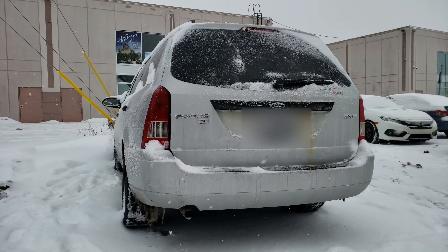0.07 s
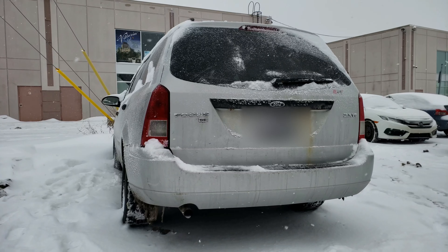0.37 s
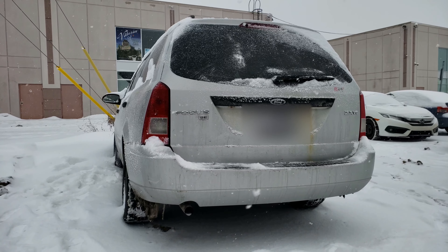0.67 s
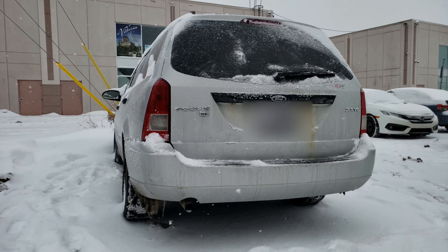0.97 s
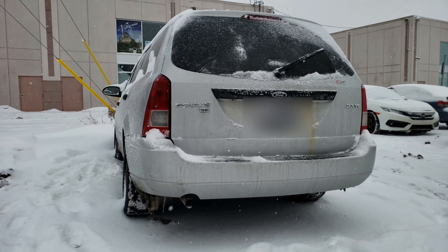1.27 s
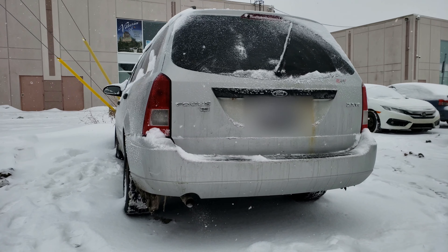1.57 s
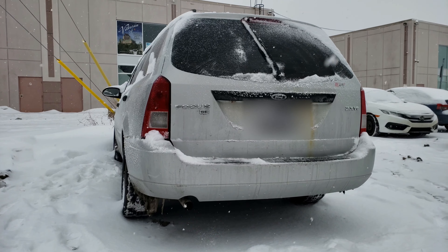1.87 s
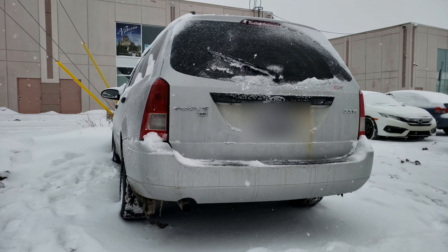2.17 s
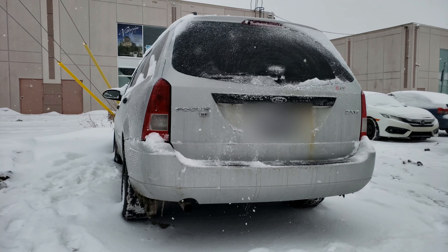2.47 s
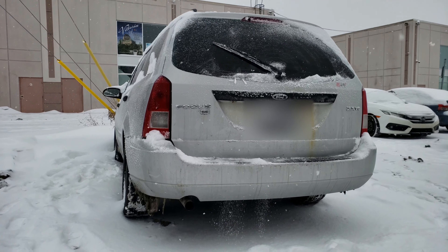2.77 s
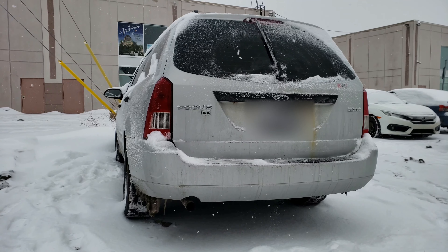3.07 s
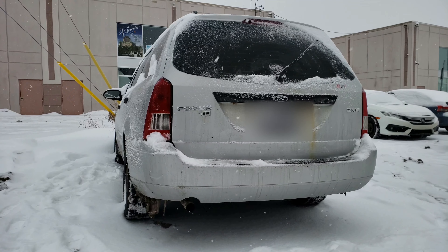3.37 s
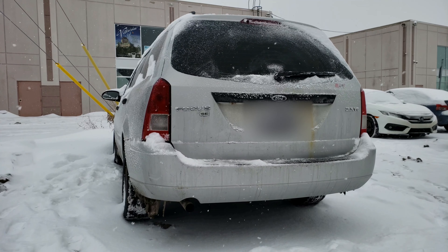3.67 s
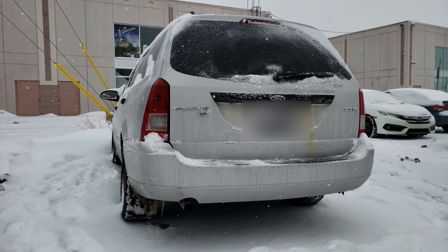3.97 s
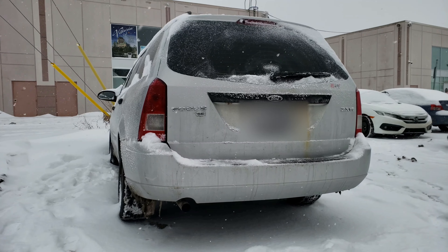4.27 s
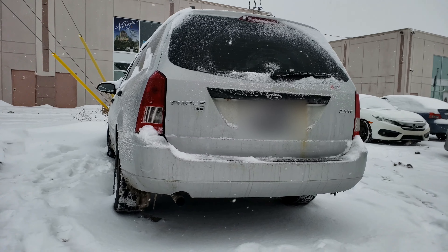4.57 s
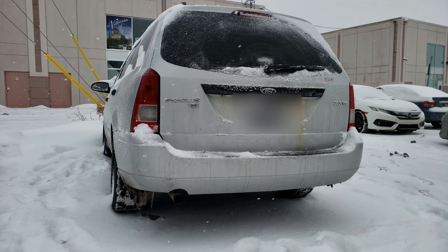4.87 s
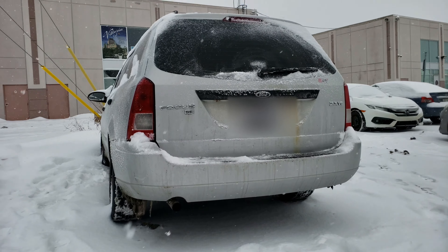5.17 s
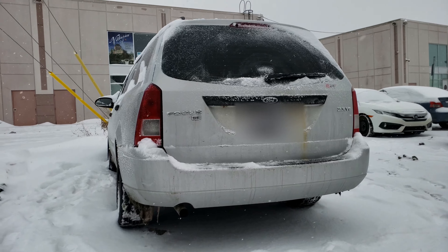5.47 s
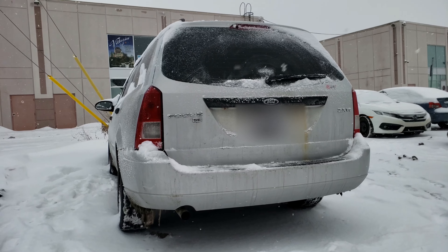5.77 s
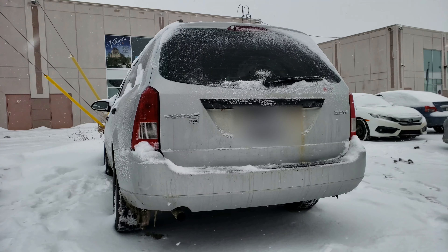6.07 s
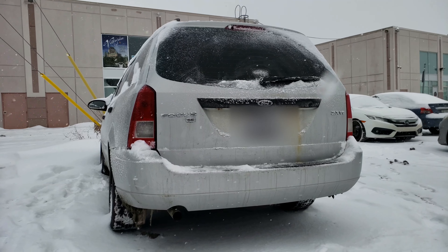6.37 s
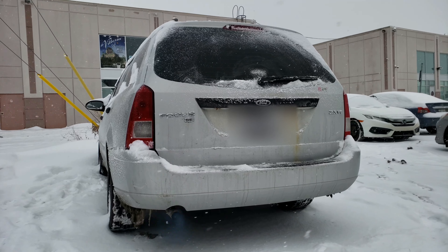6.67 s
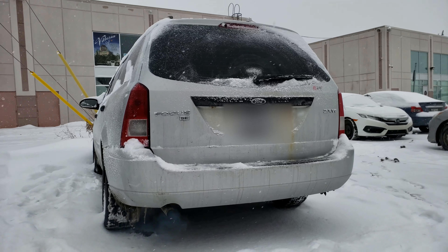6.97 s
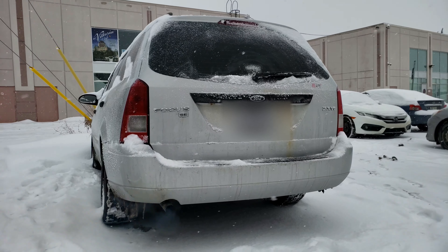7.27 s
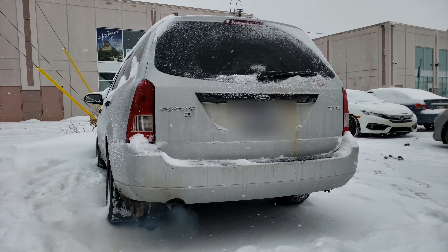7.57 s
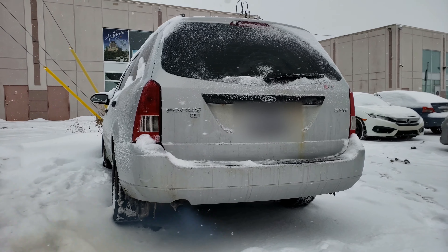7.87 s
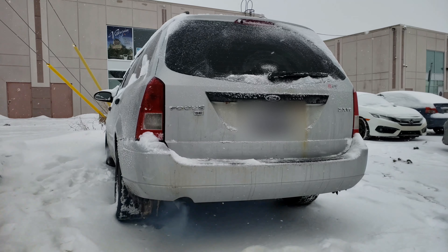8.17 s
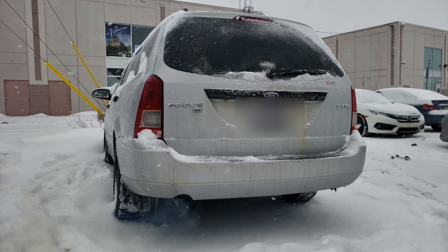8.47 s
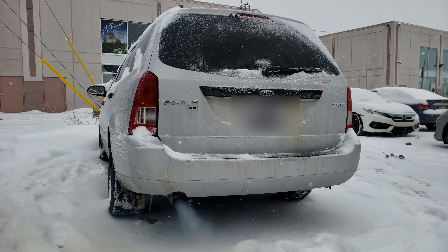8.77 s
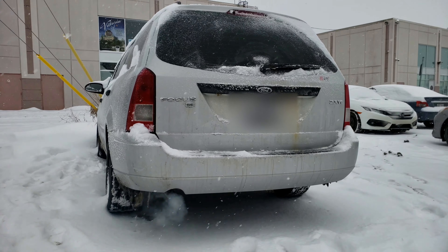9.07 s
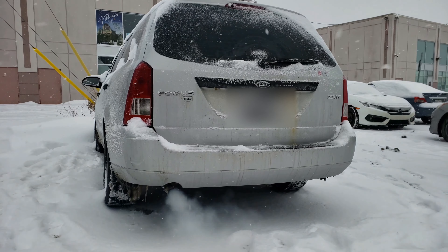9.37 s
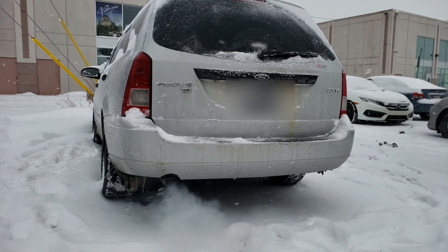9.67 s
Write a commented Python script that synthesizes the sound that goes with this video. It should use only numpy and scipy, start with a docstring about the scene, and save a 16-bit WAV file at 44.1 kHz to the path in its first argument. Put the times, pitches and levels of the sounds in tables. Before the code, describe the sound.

Heard from just behind a car parked outdoors, a cold engine cranks with a short pulsing whine and fires. It flares, sputters a little and idles for a few seconds with a low rumble and light clatter. Then comes one rev, a harder one and three quick high blips, the exhaust booming, rasping and hissing. The background is only a faint wash of distant town noise.

```python
"""Cold start in a snowy yard

A four-cylinder car is heard from behind the tailpipe while a wet power line sizzles faintly. The starter
whirrs; the engine catches, stumbles, settles to a fast idle and is revved five times. Periodic firing
makes a harmonic series that the muffler filters into a boom. With the throttle open, pressure pulses
excite the pipe's standing waves as a rasp, and the turbulent gas jet rushes."""
import sys
import numpy as np
from scipy import signal
from scipy.fft import rfft, irfft
from scipy.io import wavfile

SR = 44100
rng = np.random.default_rng(int(sys.argv[2]) if len(sys.argv) > 2 else 0)


def store_wav(level_fs):
    """Save 16-bit WAV to argv[1]."""
    pcm = np.round(np.clip(np.atleast_2d(level_fs), -1, 1) * 32767)
    wavfile.write(sys.argv[1], SR, pcm.T.astype(np.int16))


N = 437472
T = np.arange(N) / SR
HZ = np.fft.rfftfreq(N, 1 / SR)
CATCH_S, CATCH_ATTACK_S = 1.89, 0.039  # the engine begins to fire


def amp(db):
    return 10 ** (np.asarray(db) / 20)


def unit_rms(x):
    return x / np.sqrt(np.mean(x ** 2) + 1e-20)


def value_at(points, hz):
    """Interpolation on a logarithmic frequency axis."""
    freq_hz, value = np.transpose(points)
    return np.interp(np.log(hz + 1), np.log(freq_hz + 1), value)


def colour(x, spectrum):
    """Spectral shaping, normalised to rms 1."""
    return unit_rms(irfft(rfft(x) * amp(value_at(spectrum, HZ)), N))


def drift(hz):
    """Slow random modulation up to about hz, at rms 1."""
    times = np.arange(0, T[-1] + 1, .5 / hz)
    return unit_rms(np.interp(T, times, rng.standard_normal(N // 16)[:len(times)]))


def resonate(x, hz, width_hz):
    """A resonator of unit gain whose centre frequency may move."""
    carrier = np.exp(2j * np.pi * np.cumsum(hz * np.ones(N)) / SR)
    pole = np.exp(-np.pi * width_hz / SR)
    return 2 * (carrier * signal.lfilter([1 - pole], [1, -pole], x / carrier + 1e-18)).real


def ring(x, modes):
    """Modal superposition: each mode's response adds to the excitation."""
    response = 1 + sum(amp(db) / (1 + 2j * (HZ - hz) / width) for hz, width, db in modes)
    return irfft(rfft(x) * response, N)


def gate(start, end, attack, release):
    """An envelope that rises smoothly from start and decays exponentially from end."""
    rise = np.clip((T - start) / attack, 0, 1)
    return np.sin(np.pi / 2 * rise) ** 2 * np.exp(-np.maximum(T - end, 0) / release)


def arch(start, length):
    """An envelope that swells and sinks once."""
    return np.sqrt(np.abs(np.sin(np.pi * np.clip((T - start) / length, 0, 1))))


def lag(x, seconds):
    """Inertia as a first-order low-pass."""
    pole = np.exp(-1 / (seconds * SR))
    return signal.lfilter([1 - pole], [1, -pole], x)


def by_speed(rate, db, octave_db, bend_db=0, mid_hz=110):
    """A power law: db at mid_hz, plus octave_db per doubling of firing rate, curved by bend_db."""
    octaves = np.log2(rate / mid_hz)
    return amp(db + octave_db * octaves + bend_db * octaves ** 2)


def puffs(cycles, decay, steady, spread_db):
    """Amplitude modulation: two noises flare once a cycle, each time with a random strength."""
    strength = amp(spread_db * rng.standard_normal(4096))[cycles.astype(int)]
    envelope = steady + strength * np.exp(-(cycles % 1) / decay)
    return unit_rms(envelope * rng.standard_normal((2, N)))


# Likeness of left and right: freq_hz, coherence
COHERENCE = [(60, 0.44), (400, 0.68), (700, 1), (1250, 0.49), (2300, 0.91), (4200, 0.62), (7700, 0.14),
             (14000, 0.18)]
# Phase by which left leads right: freq_hz, phase_rad
PHASE_LEAD = [(0, -4), (1380, 0.93), (1640, 1.24), (2240, 1), (2840, 1.22), (3700, 1.5), (4390, 1.5),
              (5250, 4), (7580, 0.5), (9730, 13), (11200, 4), (14300, 4.5)]
# Level of left over right: freq_hz, level_db
BALANCE = [(200, -1), (500, 2.5), (1000, 1), (2000, 1), (4000, -4), (8000, -1), (14000, -1.5)]
def spatialise(pair):
    """Partial coherence: two signals mix into left and right, which differ in phase and level."""
    first, second = rfft(pair)
    coherence = np.clip(value_at(COHERENCE, HZ), 0, 1)
    mid, side = first * np.sqrt((1 + coherence) / 2), second * np.sqrt((1 - coherence) / 2)
    lead = np.exp(1j * value_at(PHASE_LEAD, HZ) / 2) * amp(value_at(BALANCE, HZ) / 2)
    return irfft(np.array([(mid + side) * lead, (mid - side) / lead]), N)


# Spectrum of distant town and still air: freq_hz, level_db
YARD_SPECTRUM = [(20, 0), (60, 3), (130, 1), (260, -11), (650, -15), (1100, -24.5), (1800, -30.5),
                 (2400, -37), (5000, -47.5), (8000, -54), (14500, -34)]
def yard(level_db=-49.5, width=0.48):
    """Diffuse noise: the surrounding streets merge into a low, restless wash."""
    mid, side = colour(rng.standard_normal((2, N)), YARD_SPECTRUM) * amp(level_db + 0.37 * drift(21))
    return np.array([mid + width * side, mid - width * side]) / np.hypot(1, width)


# Spectrum of the discharge: freq_hz, level_db
CORONA_SPECTRUM = [(1500, -38), (5200, -6), (6500, 4), (7600, -8.5), (9000, -1.5), (10000, 5.5), (11500, 2),
                   (13000, 8), (14500, -2)]
def power_line(level_db=-66, mains_hz=60):
    """Corona discharge: the snowy wire spits at both voltage crests of each mains cycle."""
    sparks = puffs(2 * mains_hz * T, decay=0.89, steady=0.16, spread_db=-1.0)
    return amp(level_db) * colour(sparks, CORONA_SPECTRUM)


# Thin tones over the idle: start_s, length_s, pitch_hz, level_db
IDLE_TONES = [(2.95, 0.99, 2110, -74), (4.6, 1.4, 1572, -74.5), (5.1, 0.66, 1265, -68.5)]
def idle_tones(width_hz=35):
    """Narrow-band noise is heard as a fuzzy pitch."""
    out = np.zeros(N)
    for start, length, hz, db in IDLE_TONES:
        band = irfft(rfft(rng.standard_normal(N)) / (1 + 2j * (HZ - hz) / width_hz) ** 2, N)
        out += amp(db) * arch(start, length) * unit_rms(band)
    return out


# Ticks and knocks: start_s, level_db, pitch_hz, decay_s, relative_crack_db
IMPACTS = [(0.955, -57, 149, 0.027, -42), (1.135, -54, 900, 0.025, 5), (1.865, -36, 152.5, 0.016, -31),
           (4.36, -66, 5010, 0.08, 10), (5.037, -60, 5010, 0.0012, 11), (5.131, -34, 517, 0.0016, -14),
           (5.1423, -34, 613, 0.0024, -17), (5.2, -62, 5000, 0.0022, 10)]
def knocks(loss_factor=0.36):
    """Damped resonance: a noise burst drives a thud and is also heard as a broadband crack."""
    out, t = np.zeros((2, N)), T[:8192]
    for start, db, hz, decay, crack_db in IMPACTS:
        burst = rng.standard_normal((2, len(t))) * np.exp(-t / decay)
        thud = signal.lfilter(*signal.iirpeak(hz, 1 / loss_factor, fs=SR), burst)
        knock = unit_rms(thud) * burst.std() + amp(crack_db) * burst
        out[:, round(start * SR):][:, :len(t)] += amp(db) * knock
    return out


def alternator(firings, level_db=-58.0, order=12):
    """A rotational order: a whine locked to engine speed while the battery recharges at idle."""
    whine = np.sqrt(2) * np.cos(2 * np.pi * order * firings)
    charging = gate(CATCH_S, end=5.9, attack=1.4, release=0.79)
    return amp(level_db) * charging * whine * (1 + .35 * drift(14))


# Compressions that load the starter: time_s, whine_db
COMPRESSION_STROKES = [(1.235, -52), (1.391, -51), (1.561, -60), (1.71, -56.5), (1.835, -58)]
# Flywheel resonances: freq_hz, width_hz, gain_db
FLYWHEEL_MODES = [(2520, 400, 2), (3650, 56, 3), (4230, 130, 2.5), (4620, 100, -20)]
# Spectrum of the gear rattle: freq_hz, level_db
GEAR_SPECTRUM = [(150, 10), (350, 6.5), (600, 1), (1000, 1.5), (1600, -9.5), (2400, -15.5), (3100, -10.5),
                 (3700, -8.5), (4350, -7), (4900, -7), (6500, -10), (8000, -15.5), (14000, -13)]
def starter(on_s=1.11, off_s=2.21, spin_up_s=.11, whine_hz=1147, width_hz=67, sag=.12):
    """Gear meshing under cyclic load: the whine sags at each compression and teeth ring the flywheel."""
    times, whine_db = np.transpose(COMPRESSION_STROKES)
    beats = np.r_[2 * times[0] - times[1], times, 2 * times[-1] - times[-2]]
    phase = 2 * np.pi * np.interp(T, beats, np.arange(len(beats)))
    slack = np.sin(phase / 2) ** 2  # 1 between compressions
    spin_up = 1 - 0.43 * np.exp(-np.maximum(T - on_s, 0) / spin_up_s)
    hz = whine_hz * (1 - sag * np.sin(phase)) * spin_up
    whine = unit_rms(resonate(resonate(rng.standard_normal((2, N)), hz, width_hz), hz, width_hz))
    contacts = puffs(np.cumsum(hz / 9) / SR, decay=1.0, steady=0.91, spread_db=3.0)
    teeth = colour(ring(contacts, FLYWHEEL_MODES), GEAR_SPECTRUM)
    cranking = amp(np.interp(T, times, whine_db) - 22 * slack) * whine + amp(-49 - 5 * slack) * teeth
    # Once it fires, the engine carries the pinion along until the rattle dies away.
    overrun = amp(-47) * gate(CATCH_S, off_s, CATCH_ATTACK_S, release=.24) * teeth
    return gate(on_s, CATCH_S, attack=0.017, release=0.025) * cranking + overrun


# Exhaust pipe resonances: freq_hz, width_hz, gain_db
PIPE_MODES = [(444, 22, 0.5), (587, 10, -0.5), (850, 82, -5), (1076, 60, 3), (1293, 56, 6.5), (1500, 56, 0),
              (1641, 45, -8), (1860, 23, -14), (2046, 46, 18.5), (2200, 36, -3), (2760, 40, 9),
              (2912, 57, 8)]
def pipe(excitation):
    """Standing waves in the exhaust pipe colour the sound that passes through it."""
    return ring(excitation, PIPE_MODES)


# Spectrum of the valve clatter: freq_hz, level_db
CLATTER_SPECTRUM = [(150, 15), (300, 4), (480, 1), (540, 1), (630, 9), (740, -5.5), (1000, -6),
                    (1500, -18.5), (1900, -21), (2300, -15.5), (3100, -18), (5000, -14.5), (8000, -22),
                    (14000, -30.5)]
# Spectrum of the gas flow: freq_hz, level_db
WHIRR_SPECTRUM = [(200, -47), (450, -1), (900, 10), (1300, 7.5), (1800, 5), (2250, 7.5), (2900, -0.5),
                  (3500, -7.5), (5500, -6.5), (8000, -18), (10500, -66), (14500, -30)]
def engine_block(rate, firings, flare, pipe_share=0.13, flare_db=-2.0):
    """Noise pulsed at the firing rate: valves clatter, and the whirr of gas flow grows with speed."""
    clatter = colour(puffs(firings, decay=0.95, steady=1.0, spread_db=0.5), CLATTER_SPECTRUM)
    clatter *= by_speed(rate, db=-41.0, octave_db=8, bend_db=2.5) * amp(flare_db * flare)
    flow = puffs(firings, decay=0.71, steady=1.0, spread_db=5.0)
    whirr = colour((1 - pipe_share) * flow + pipe_share * pipe(flow), WHIRR_SPECTRUM)
    return clatter + by_speed(rate, db=-53.5, octave_db=14.5, bend_db=1.8) * whirr


# Spectrum of the pipe's rasp: freq_hz, level_db
RASP_SPECTRUM = [(150, 14), (330, 4), (800, 9), (1300, 5), (1750, 2), (2100, -16), (2900, -25),
                 (3600, -18.5), (6000, -57.5), (14000, -43)]
def blowdown(rate, firings, load, gas_share=.65, howl_hz=1485, width_hz=110):
    """Impulse excitation: under load each cylinder's release rings the pipe, and the intake howls."""
    count = firings.astype(int)
    cylinder_db = np.array([2.5, -2.5, .8, -3.5])[count % 4]
    strength = amp(cylinder_db + 2 * rng.standard_normal(4096)[count])
    cracks = unit_rms(-np.diff(count, prepend=0) * strength / np.sqrt(rate))
    gas = puffs(firings, decay=.28, steady=.35, spread_db=2.5)
    drive = np.sqrt(1 - gas_share) * np.array([cracks, np.roll(cracks, 70)]) + np.sqrt(gas_share) * gas
    rasp = colour(pipe(drive), RASP_SPECTRUM)
    howl = unit_rms(resonate(resonate(drive, howl_hz, width_hz), howl_hz, width_hz))
    howl *= amp(np.interp(rate, [58.12, 83.85, 120, 200], [-17, -7.5, -6, -15]))
    return load * by_speed(rate, db=-35, octave_db=7) * (rasp + howl)


# Spectrum of the gas rush: freq_hz, level_db
JET_SPECTRUM = [(700, -8), (1800, 13.5), (2700, 14), (3600, 6.5), (4600, 3.5), (6500, 5.5), (8500, 2),
                (10500, -3.5), (12200, 5), (14500, -1.5)]
def gas_jet(rate, firings, load):
    """Turbulent jet noise trails a wide throttle, and persists at high speed even when coasting."""
    driven = lag(load ** 1.7, seconds=0.015) * by_speed(rate, db=-44.5, octave_db=14, bend_db=-2.5)
    coasting = by_speed(rate, db=-70.5, octave_db=28.5)
    rush = colour(puffs(firings, decay=1.0, steady=1.0, spread_db=2.0), JET_SPECTRUM)
    return (driven + coasting) * rush


# The pipe's response to the firing harmonics: freq_hz, gain_db
PIPE_RESPONSE = [(240, -13.5), (320, -6), (400, -9.5), (462, 9), (525, -8.5), (628, 8), (720, -11),
                 (820, -1), (930, -15), (1090, -8.5), (1350, -20), (1480, -18.5), (1700, -17.5), (2400, -6),
                 (3200, -39)]
def snarl(rate, firings, load, half_order_db=-5, load_db=9):
    """Formants: harmonics and weaker half orders swell as they sweep through the pipe's resonances."""
    partials = np.zeros(N)
    for order in np.arange(3, 33) / 2:
        gain = amp(value_at(PIPE_RESPONSE, rate * order) + half_order_db * (order % 1 > 0))
        flutter = 1 + .35 * drift(13)
        partials += gain * flutter * np.cos(2 * np.pi * (order * firings + rng.random()))
    return by_speed(rate, db=-48.0, octave_db=12, bend_db=-4.5) * amp(load_db * load) * partials / 2


def lope(rate, sputter, sputter_db=-4):
    """Cycle-to-cycle variation: strong and weak firings alternate unevenly, making a deep flutter."""
    hz = 41 + 8 * drift(16)
    flutter = np.cos(2 * np.pi * np.cumsum(hz) / SR) * (1 + 0.27 * drift(30))
    return np.sqrt(2) * (amp(sputter_db) * sputter + by_speed(rate, db=-64, octave_db=-4)) * flutter


def acceleration(rate, hard_octaves_per_s=0.71):
    """Tends to 1 while the engine gains speed and to -1 while it coasts down."""
    return lag(np.tanh(np.gradient(np.log2(rate)) * SR / hard_octaves_per_s), seconds=.08)


# Transmission of the muffler: freq_hz, gain_db
MUFFLER_RESPONSE = [(20, -28.5), (55, -11), (90, -2.5), (110, -0.5), (140, 1), (168, 5), (188, -2.5),
                    (210, 5.5), (252, 0.5), (268, -11.5), (304, -10.5), (350, -45), (465, -34), (720, -58)]
# Strength of the fundamental: firing_rate_hz, level_db
BOOM_LEVELS = [(46, -52), (51.5, -45.5), (53.3, -36.5), (75, -35.5), (101, -30.5), (115, -34), (133, -19),
               (150, -13.5), (172, -11), (192, -13.5), (212, -16), (226, -11.5)]
def muffler(rate, firings, load, flare, sputter, half_order_db=-16, quarter_order_db=-17):
    """Source and filter: firing harmonics pass the muffler; unlike cylinders add orders between them."""
    boom = amp(value_at(BOOM_LEVELS, rate) - 1.5 * load - 0.48 * drift(6)) + amp(-39) * flare
    fundamental = boom * np.cos(2 * np.pi * firings) * (1 + 0.087 * drift(25))
    firing_up = gate(CATCH_S, T[-1], attack=0.16, release=1)  # until all four cylinders fire fully
    effort = amp(2 * load + 2 * acceleration(rate))
    overtone_gain = by_speed(rate, db=-37.5, octave_db=5.5, bend_db=1) * effort * firing_up
    overtones = np.zeros(N)
    for harmonic in np.r_[2:4, 5:37]:  # of the four-firing cycle; the fourth is the boom
        hz = rate * harmonic / 4
        imbalance_db = (0, quarter_order_db, half_order_db, quarter_order_db)[harmonic % 4]
        level_db = value_at(MUFFLER_RESPONSE, hz) + imbalance_db * np.interp(hz, [130, 250], [1.4, .65])
        offset = rng.random() if imbalance_db else harmonic ** 2 / 200
        overtones += amp(level_db) * np.cos(2 * np.pi * (harmonic / 4 * firings + offset))
    unevenness = by_speed(rate, db=-45, octave_db=6.0, bend_db=3) + amp(-8) * sputter
    gas = puffs(firings, decay=0.13, steady=0.064, spread_db=5)[0]
    burble = firing_up * unevenness * colour(gas, MUFFLER_RESPONSE)
    return np.sqrt(2) * (fundamental + overtone_gain * overtones) + burble


# Engine speed through the catch, the fast idle and the revs: time_s, firing_rate_hz
ENGINE_SPEED = [(1.9, 26.4), (2.1, 50), (2.3, 65), (2.82, 45.3), (3.7, 52.76), (4.7, 53.52), (5.25, 58),
                (5.55, 57.21), (6.05, 53.75), (6.19, 59.14), (6.33, 74.5), (6.61, 127.5), (6.7, 136),
                (7.02, 110.5), (7.24, 101), (7.45, 87), (7.6, 86), (7.85, 141.5), (8.02, 179.5),
                (8.15, 199), (8.62, 155.5), (8.75, 172), (8.97, 212), (9.16, 199.5), (9.41, 225.5),
                (9.5, 217), (9.66, 231.5), (9.92, 209)]
# Throttle openings: open_s, close_s, attack_s, release_s, strength_db
THROTTLE_PUSHES = [(4.3, 6.312, 0.8, 0.1, -22), (6.153, 6.35, 0.044, .05, -13.5),
                   (6.266, 6.585, 0.23, 0.054, 0.5), (7.551, 8.109, 0.12, 0.018, 0.5),
                   (8.23, 8.41, .05, 0.027, -10), (8.601, 8.959, 0.085, 0.014, 0),
                   (9.147, 9.391, 0.037, 0.014, -1.5), (9.5, 9.634, 0.034, 0.029, -2)]
# Spells of weak and missed firings: start_s, length_s, strength_db
MISFIRES = [(1.89, 0.23, -29.5), (2.312, 0.43, -30.5), (2.752, 0.077, -33), (5.393, 0.074, -34),
            (6.717, 0.36, -29), (7.28, .16, -32.5), (8.227, 0.19, -32), (8.958, 0.071, -30),
            (9.136, 0.068, -48), (9.245, 0.078, -34), (9.44, 0.46, -34)]
def scene():
    """Superposition: speed and throttle drive the engine's layers; the yard and the wire lie behind."""
    rate = np.interp(T, *np.transpose(ENGINE_SPEED))
    firings = np.cumsum(rate * (1 + .003 * drift(20))) / SR  # phase, one cycle per firing
    running = gate(CATCH_S, T[-1], CATCH_ATTACK_S, release=1)
    flare = gate(CATCH_S, end=1.8, attack=0.34, release=0.15)  # a brief surge as the engine catches
    load = sum(amp(db) * gate(*timing) for *timing, db in THROTTLE_PUSHES)
    sputter = sum(amp(db) * arch(start, length) for start, length, db in MISFIRES)
    tonal = muffler(rate, firings, load, flare, sputter) + lope(rate, sputter)
    tonal += snarl(rate, firings, load) + alternator(firings) + idle_tones()
    noisy = engine_block(rate, firings, flare) + blowdown(rate, firings, load)
    noisy += gas_jet(rate, firings, load)
    wide = spatialise(running * noisy + starter() + knocks())
    central = running * tonal * amp([[.15], [-.15]])
    return central + wide + yard() + power_line()


def record(dry, low_cut_hz=27, high_cut_hz=14620):
    """Band limiting: after a quick fade-in, filters remove the deepest bass and the highest treble."""
    fade_in = np.interp(T, [.073, .08], [.01, 1])
    high_pass = signal.butter(3, low_cut_hz, "high", fs=SR, output="sos")
    low_pass = signal.firwin(511, high_cut_hz, window=("kaiser", 9), fs=SR)
    return signal.oaconvolve(signal.sosfilt(high_pass, dry * fade_in), low_pass[None], "same")


dry = scene()
out = record(dry)
store_wav(out)
```